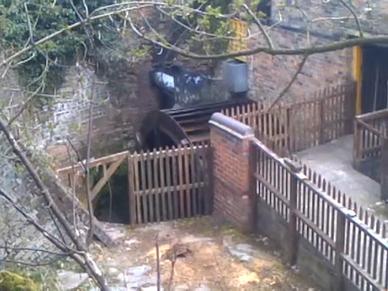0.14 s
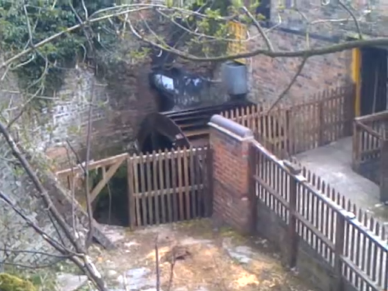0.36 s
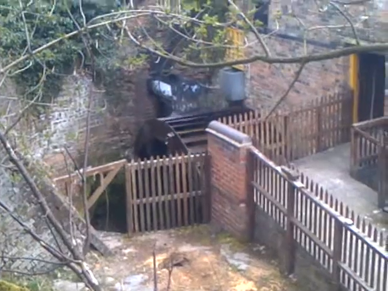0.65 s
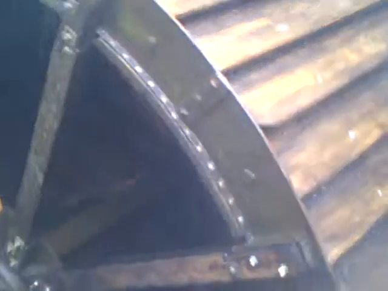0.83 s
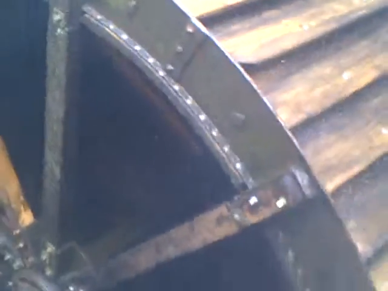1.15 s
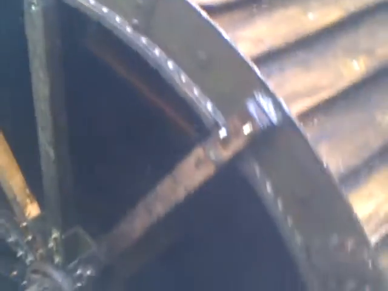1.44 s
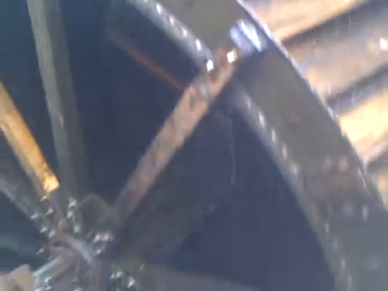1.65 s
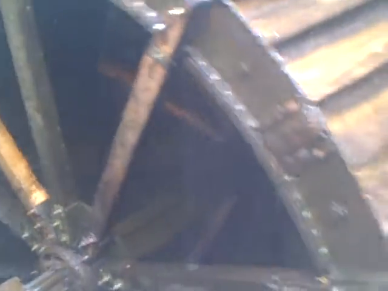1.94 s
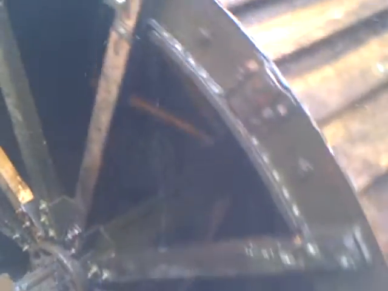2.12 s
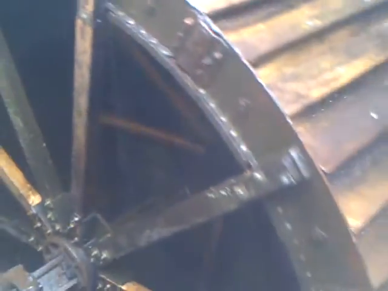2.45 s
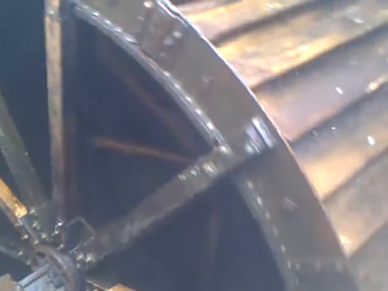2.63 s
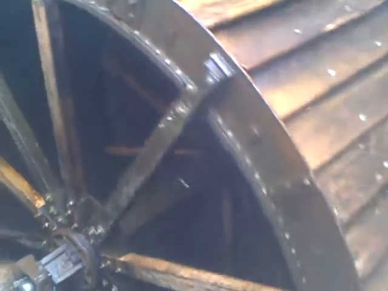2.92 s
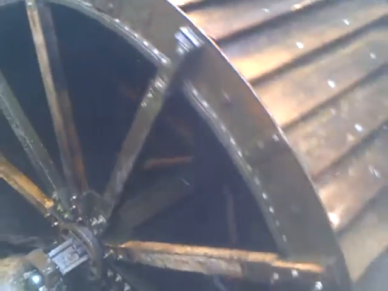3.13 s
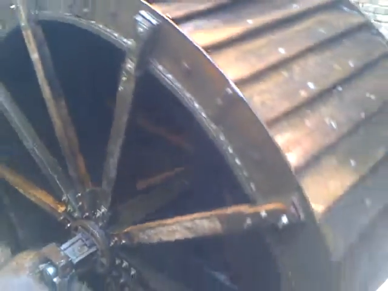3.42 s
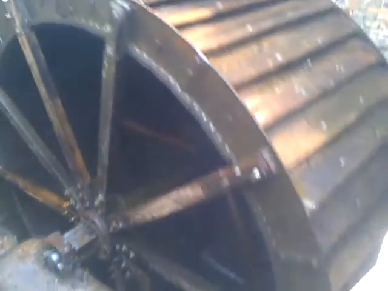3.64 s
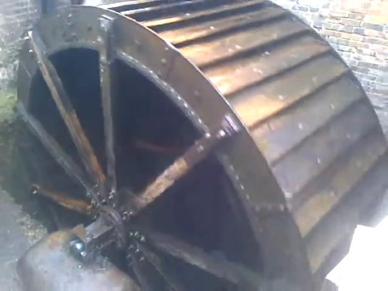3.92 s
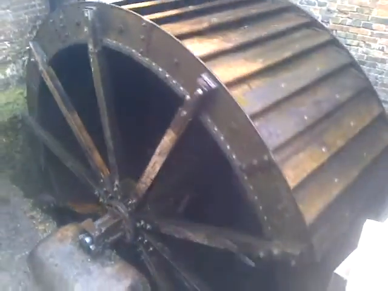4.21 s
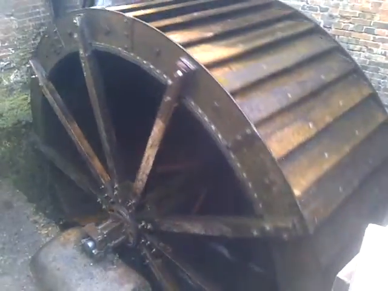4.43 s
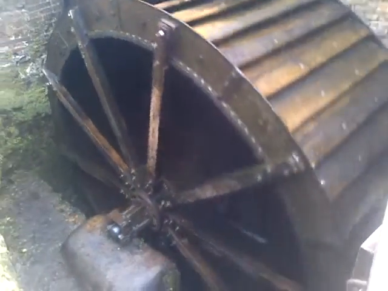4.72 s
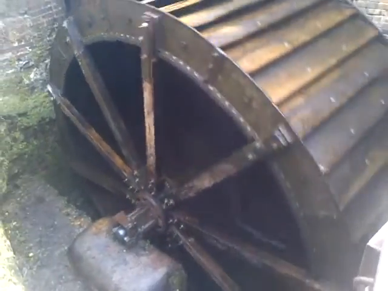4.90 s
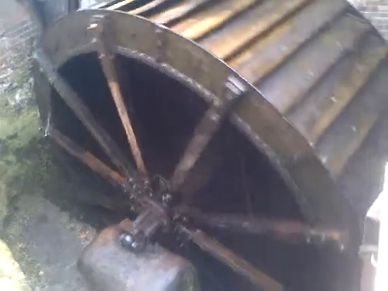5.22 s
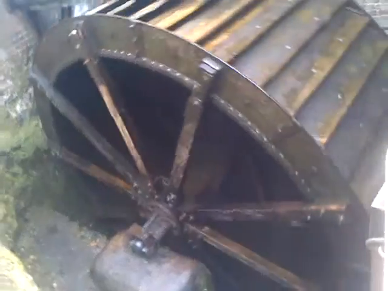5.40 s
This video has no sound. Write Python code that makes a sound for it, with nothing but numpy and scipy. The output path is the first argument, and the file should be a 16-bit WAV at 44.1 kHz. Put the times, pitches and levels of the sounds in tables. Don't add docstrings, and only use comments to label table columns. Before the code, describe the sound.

Muffled, hollow rushing water across a yard jumps abruptly to a loud, wide roar of splashing, bubbling water beside a turning waterwheel.

```python
import sys
import numpy as np
from scipy import signal
from scipy.fft import rfft, irfft
from scipy.io import wavfile
from scipy.ndimage import uniform_filter1d

SR = 44100
rng = np.random.default_rng(int(sys.argv[2]) if len(sys.argv) > 2 else 0)


def decibels_to_gain(level_db):
    exponent = np.asarray(level_db, float) / 20
    return 10 ** exponent


def file_out(sig):
    cols = np.atleast_2d(sig).T
    lim = np.clip(cols, -1, 1)
    pcm = np.round(lim * 32767).astype(np.int16)
    wavfile.write(sys.argv[1], SR, pcm)


N = 245195

CUT_S = 0.8145
FAR_DB, NEAR_DB = -38.5, -31.5
CUT_TICK_DB = -50.5
MIC_HISS_DB = -92
TIP_SKEW = 0.7
SHADED_S, SHADE_DB_PER_S = 5.3, -11
SPATTER_S = 0.05

LAYER_HZ = [330, 950, 2000, 4200]
LAYER_FOLLOW = [0.97, 0.47, .9, 1.4]
# [f/Hz, level/dB]
FAR_COLOUR = [(30, -38), (110, -52.5), (290, -7.5), (496, -16.5), (830, -5), (1360, -10.5), (1650, -4.5),
              (1950, -8), (2130, -22), (2420, -13.5), (2800, -24.5), (3200, -14.5), (4370, -22.5),
              (8020, -57.5)]
# [f/Hz, level/dB]
NEAR_COLOUR = [(30, -34.5), (100, -42.5), (140, -34.5), (258, -3.5), (326, 1), (585, -7), (1050, -3),
               (2320, -7), (2800, -10.5), (3220, -7.5), (4370, -12.5), (5780, -25), (6810, -35.5),
               (8000, -59.5)]
# [t/s, level/dB]
FAR_FLOW = [(0, 1.6), (.6, 0.5), (.75, 1.3), (.81, -0.5)]
# [t/s, level/dB]
NEAR_FLOW = [(.82, -1.5), (1.13, -1), (1.4, -0.8), (1.8, -1.56), (2.1, -0.2), (2.4, -.4), (2.68, .8),
             (2.9, 0), (3.3, -0.15), (3.7, 0.2), (4.1, 0.7), (4.45, 0.5), (4.75, 0.1), (5.05, -0.15),
             (5.3, 0.66), (5.56, 0.5)]
# [rate/Hz, t of one crest/s, swell of the four layers/dB]
FAR_TIPS = (3.3, 0.15, [-.5, 0.6, 2.5, 0])
NEAR_TIPS = (3.046, 2.696, [0.38, .3, 0.22, 0.14])
# [t of crest/s, peak level/dB, hollow f/Hz, width f/Hz, length/s]
SURGES = [
    (0.817, -32, 900, 1100, 0.012),
    (0.848, -41.5, 710, 700, 0.066),
    (1.014, -31.5, 290, 109, .06),
    (2.649, -38.5, 406, 140, .1),
    (4.106, -34, 860, 300, 0.093),
    (4.92, -37.5, 896, 348, .1),
    (2.44, -39.5, 398, 151, .09),
    (4.327, -33.5, 340, 110, .13),
    (5.288, -32.5, 310, 119, 0.12),
    (5.527, -34.5, 330, 150, 0.077),
]
# [t/s, peak level/dB, ring f/Hz, rise of pitch/factor, fall by 60 dB/s]
DROPS = [
    (.7826, -19, 2800, 1.6, .007),
    (.7828, -25, 4700, 1.2, .004),
    (2.5428, -23, 2300, 1.05, .014),
    (2.6374, -22, 3600, 1.1, .008),
    (4.6135, -31, 3300, 1, .15),
]
# [f/Hz, level/dB]
MIC_HISS = [(6000, -30), (7000, 0), (7700, -2), (8100, -8), (8400, -18), (9000, -25)]


def evened(x):
    return x / np.sqrt(np.mean(abs(x) ** 2) + 1e-20)


def read(points, hz):
    f, value = np.transpose(points)
    return np.interp(np.log(hz + 1), np.log(f + 1), value)


def add(mix, s, sound):
    part = mix[round(s * SR):][:len(sound)]
    part += sound[:len(part)]


def bubbles(per_s, cycles, glide, spread_db, size, count=40):
    out = np.zeros(size)
    strengths = decibels_to_gain(spread_db * np.minimum(rng.exponential(1, size), 5))
    for hz in np.geomspace(180, 7500, count):
        turns = np.arange(round(3 * 12 * SR / hz)) * hz / SR
        ring = np.sin(2 * np.pi * turns * (1 + glide * turns / cycles))
        ring *= np.exp(-2 * turns / cycles) * (1 - np.exp(-2 * turns))
        chance = rng.random(size)
        strength = rng.choice(strengths, size)
        often = per_s / count * np.sqrt(hz / 1000) / SR
        births = strength * np.clip((often - chance) * SR / 20, 0, 1)
        out += evened(signal.oaconvolve(births, ring)[:size]) * np.sqrt(hz)
    return evened(out)


def pit(x, t60, wet_db):
    at = np.arange(100, 12000, 20) + rng.integers(0, 20, 595)
    taps = np.zeros(12100)
    taps[at] = rng.choice([-1., 1.], len(at)) * decibels_to_gain(-60 * at / SR / t60)
    echoes = signal.oaconvolve(x, taps / np.linalg.norm(taps))[:len(x)]
    z = rfft(x + decibels_to_gain(wet_db) * echoes)
    ripple = np.sqrt(uniform_filter1d(abs(z) ** 2, size=80 * len(x) // N) + 1e-9)
    return evened(irfft(z / ripple, len(x)))


def sway(t, flow, tips):
    per_s, crest_s, swell_db = tips
    flow_db = np.interp(t, *np.transpose(flow))
    turn = 2 * np.pi * per_s * (t - crest_s)
    tipping = np.cos(turn - TIP_SKEW * (np.cos(turn) - 1))
    layers_db = np.outer(LAYER_FOLLOW, flow_db) + np.outer(swell_db, tipping)
    layers_db[-1] += SHADE_DB_PER_S * np.maximum(t - SHADED_S, 0)
    return layers_db


def water(grains, flow, tips, colour, level_db, grain_share, patchy_db, flicker_db):
    hz, t, z = signal.stft(grains, SR, nperseg=1024, noverlap=896)
    z = z / np.sqrt((abs(z) ** 2).mean(1) + 1e-14)[:, None]
    hiss = signal.stft(rng.standard_normal(len(grains)), SR, nperseg=1024, noverlap=896)[2]
    share = np.clip(grain_share, 0, 1) * ((hz > 170) & (hz < 8000))[:, None]
    z = np.sqrt(share) * z + np.sqrt(1 - share) * evened(hiss)

    gusts, patches = rng.standard_normal((len(t), len(hz), 2)).T
    patches = evened(uniform_filter1d(uniform_filter1d(patches, size=16, axis=0), size=24, axis=1))
    flicker = evened(uniform_filter1d(uniform_filter1d(gusts, size=120, axis=0), size=8, axis=1))
    lively = np.clip(hz / 1800, .3, 1)[:, None]
    unrest_db = lively * (patchy_db * patches + flicker_db * flicker)

    place = np.interp(np.log(hz + 1), np.log(LAYER_HZ), np.arange(4))
    weight = np.maximum(1 - abs(place[:, None] - np.arange(4)), 0)
    z = z * decibels_to_gain(read(colour, hz)[:, None] + weight @ sway(t, flow, tips) + unrest_db)
    out = signal.istft(z, SR, nperseg=1024, noverlap=896)[1][:len(grains)]
    heard = out[round(flow[0][0] * SR):round(flow[-1][0] * SR)]
    return decibels_to_gain(level_db) * out / np.sqrt(np.mean(heard ** 2))


def surges():
    out = np.zeros(N)
    noises = rng.standard_normal((len(SURGES), 16000))
    for (s, db, hz, width_hz, length), noise in zip(SURGES, noises):
        hollow = signal.iirpeak(hz, hz / width_hz, SR)
        boom = signal.lfilter(*hollow, signal.lfilter(*hollow, noise))
        boom = evened(boom)[2000:]
        u = np.arange(len(boom)) / SR / (0.28 * length)
        add(out, s - .3 * length, decibels_to_gain(db) * boom * u * np.exp(1 - u))
    return signal.sosfilt(signal.butter(4, 230, "high", fs=SR, output="sos"), out)


def drops():
    out, t = np.zeros(N), np.arange(4000) / SR
    noises = rng.standard_normal((len(DROPS), len(t)))
    for (s, db, hz, rise, t60), noise in zip(DROPS, noises):
        noisy = np.clip(t60 / SPATTER_S, 0, 1)
        spread = signal.iirpeak(hz, 1.9, SR)
        droplets = evened(signal.lfilter(*spread, signal.lfilter(*spread, noise)))
        pitch = hz * (rise - (rise - 1) * np.exp(-t / .0007))
        tone = np.sin(2 * np.pi * np.cumsum(pitch) / SR)
        ring = (1 - noisy) * tone + noisy * droplets
        onset = 1 - np.exp(-t / (.00012 + t60 / 40))
        add(out, s, decibels_to_gain(db - 60 * t / t60) * ring * onset)
    return signal.sosfilt(signal.butter(4, 5400, fs=SR, output="sos"), out)


def mic_hiss():
    colour = decibels_to_gain(read(MIC_HISS, np.fft.rfftfreq(N, 1 / SR)))
    return decibels_to_gain(MIC_HISS_DB) * evened(irfft(rfft(rng.standard_normal(N)) * colour, N))


def patchy_treble(x, edge_hz, jitter_hz, poised_db, per_db):
    hz, t, z = signal.stft(x, SR, window="cosine", nperseg=2048, noverlap=1024)
    pitch = hz[:, None]
    loud_db = uniform_filter1d(10 * np.log10((abs(z) ** 2).sum(0) + 1e-12), size=3)
    spare, wobble, rest = rng.standard_normal((len(t), 3)).T
    spare = evened(uniform_filter1d(spare, size=3))
    edge = 172 * np.round((edge_hz + jitter_hz * wobble) / 172)
    joined = abs(t - CUT_S + .01) < .024
    edge[joined & (t < CUT_S)] = 6400

    band = np.clip((hz - 6900) // 258, 0, 7).astype(int)
    holes = rng.random((len(t), 8)).T[band] < .25
    spared = (spare > per_db * (loud_db - poised_db)) & ~joined & ~(holes & (pitch > 6900))
    last_band = (pitch > 8500) & (uniform_filter1d(rest, size=3) > -.05)
    kept = (pitch < edge) | spared | (last_band & ~joined)
    return signal.istft(z * kept, SR, window="cosine", nperseg=2048, noverlap=1024)[1][:N]


def scene():
    far_grains = pit(bubbles(per_s=1300, cycles=5.5, glide=0.07, spread_db=1.5, size=SR), t60=0.18, wet_db=3.5)
    near_grains = pit(bubbles(per_s=3760, cycles=5.6, glide=0.063, spread_db=3.0, size=N), t60=0.14, wet_db=0.0)
    far = water(far_grains, FAR_FLOW, FAR_TIPS, FAR_COLOUR, FAR_DB,
                grain_share=0.19, patchy_db=-0.7, flicker_db=-0.3)
    near = water(near_grains, NEAR_FLOW, NEAR_TIPS, NEAR_COLOUR, NEAR_DB,
                 grain_share=0.37, patchy_db=.5, flicker_db=.5)
    arrived = np.clip((np.arange(N) / SR - CUT_S) / .002, 0, 1)
    near = signal.sosfilt(signal.butter(2, 35, "high", fs=SR, output="sos"), arrived * near)
    far = (1 - arrived) * np.pad(far, (0, N - SR))
    return (far + near + drops() + surges())[None]


def roll_off(x):
    return signal.sosfilt(signal.butter(12, 8940, fs=SR, output="sos"), x)


def record(dry):
    low_pass = signal.firwin(201, 8800, window=("kaiser", 9), fs=SR)
    heard = signal.oaconvolve(dry[0] + mic_hiss(), low_pass, "same")
    heard = patchy_treble(heard, edge_hz=7300, jitter_hz=180, poised_db=-37, per_db=.33)
    tick = signal.firwin(61, [5500, 8800], pass_zero=False, fs=SR)
    add(heard, CUT_S, decibels_to_gain(CUT_TICK_DB) * tick / tick.max())
    ease_in = np.clip(np.arange(N) / 40, 0, 1)
    ease_out = np.clip((N - np.arange(N)) / 60, .2, 1)
    return roll_off((heard * ease_out * ease_in)[None])


dry = scene()
out = record(dry)
file_out(out)
```